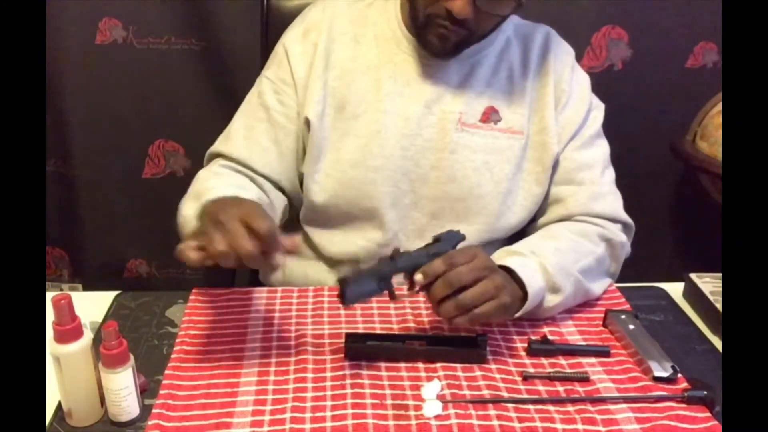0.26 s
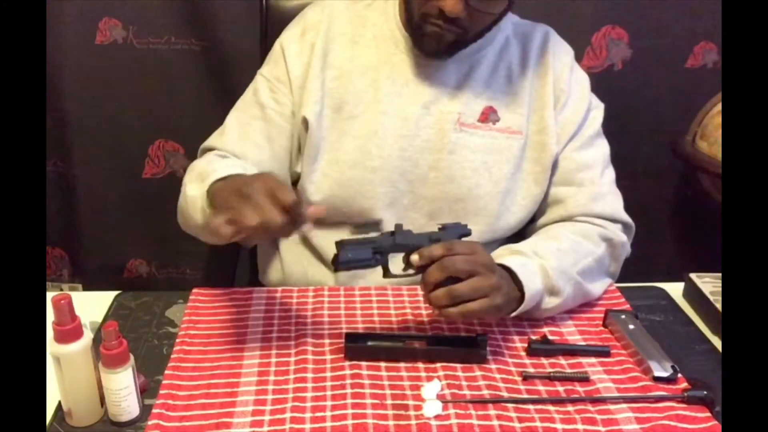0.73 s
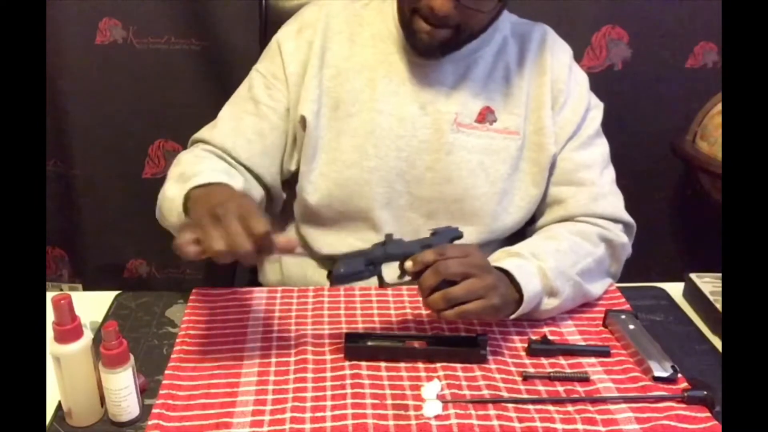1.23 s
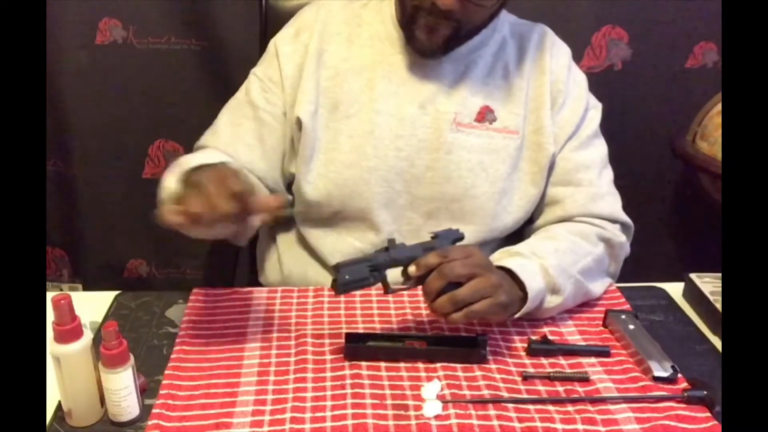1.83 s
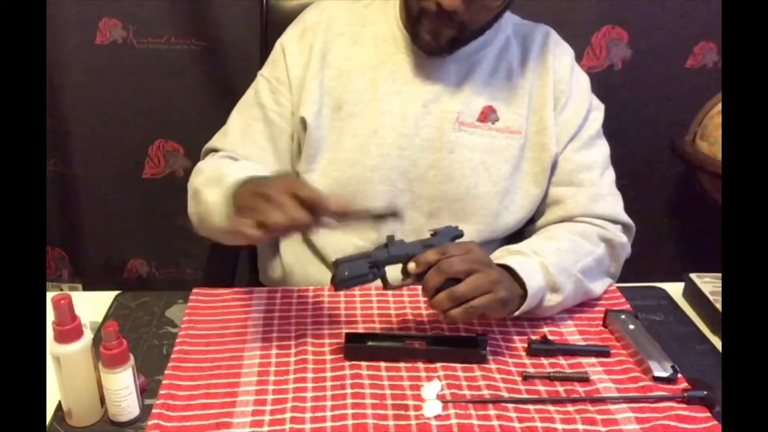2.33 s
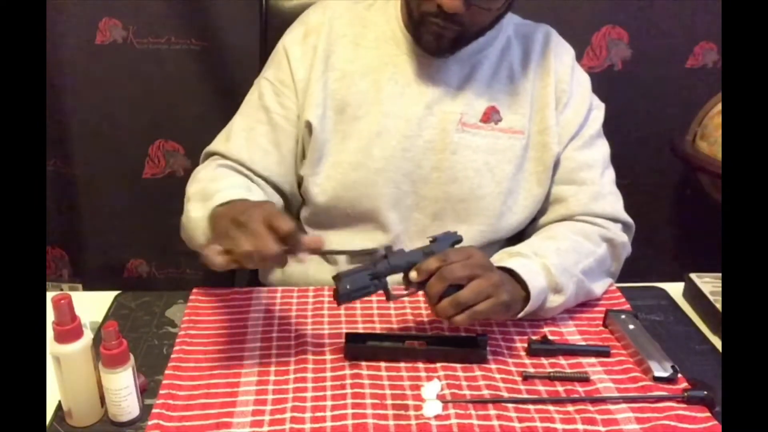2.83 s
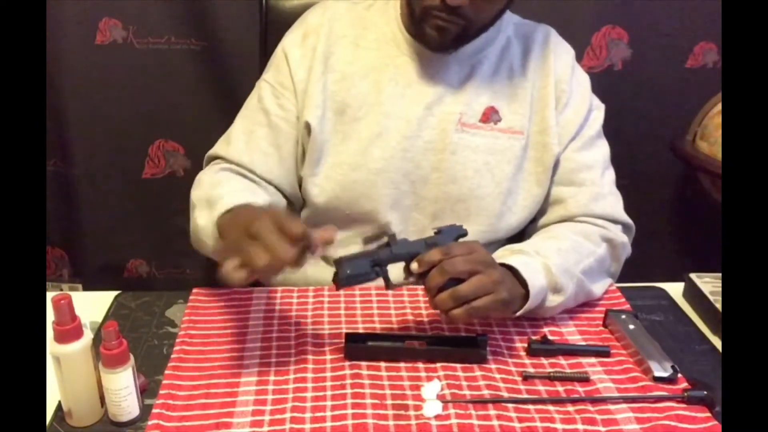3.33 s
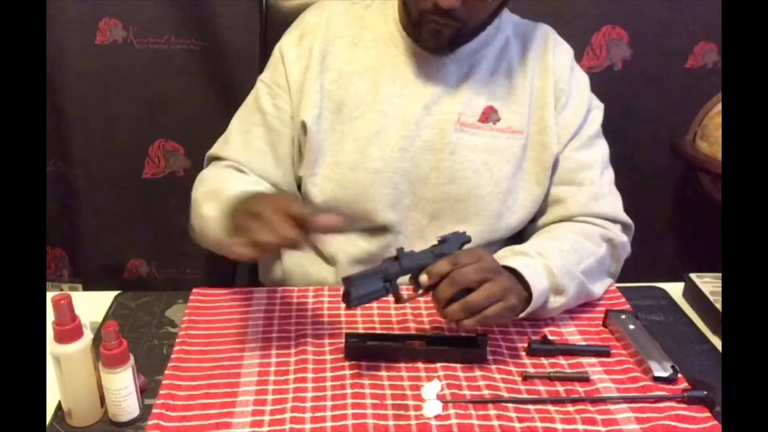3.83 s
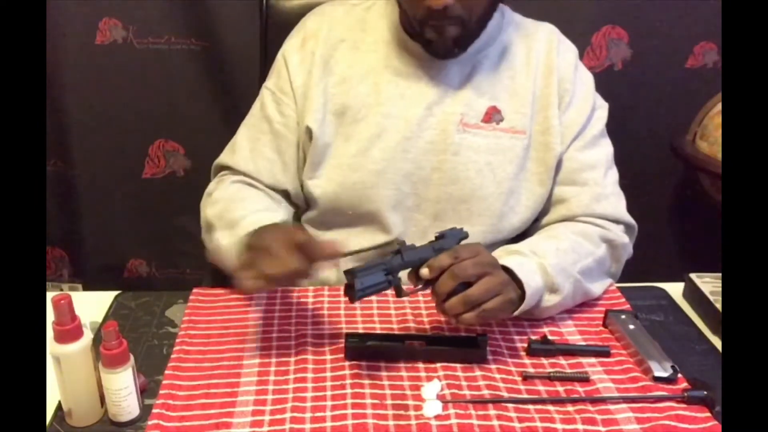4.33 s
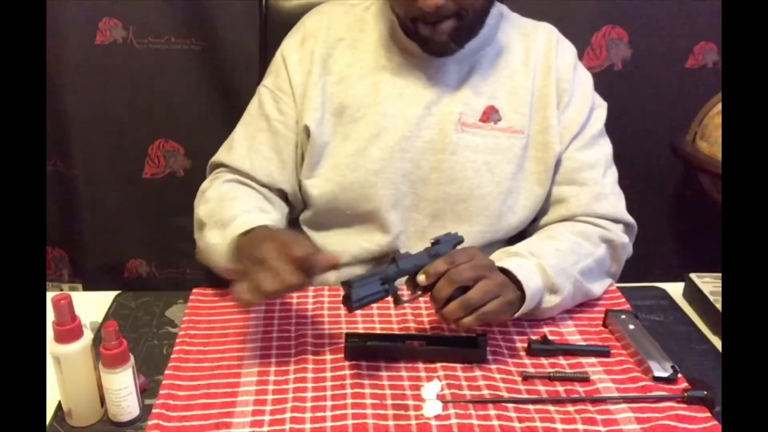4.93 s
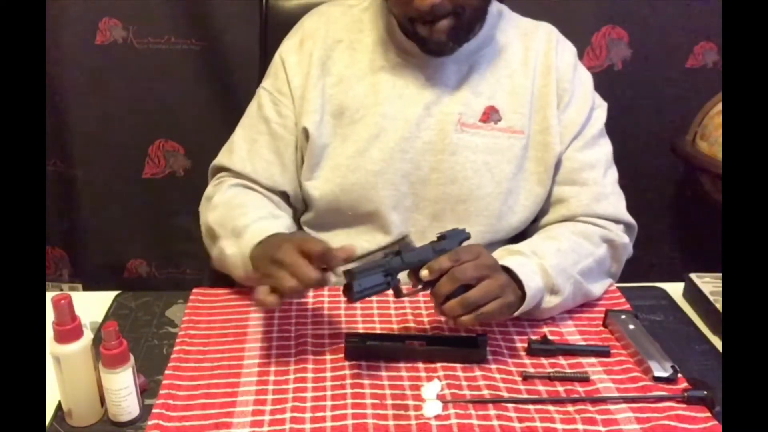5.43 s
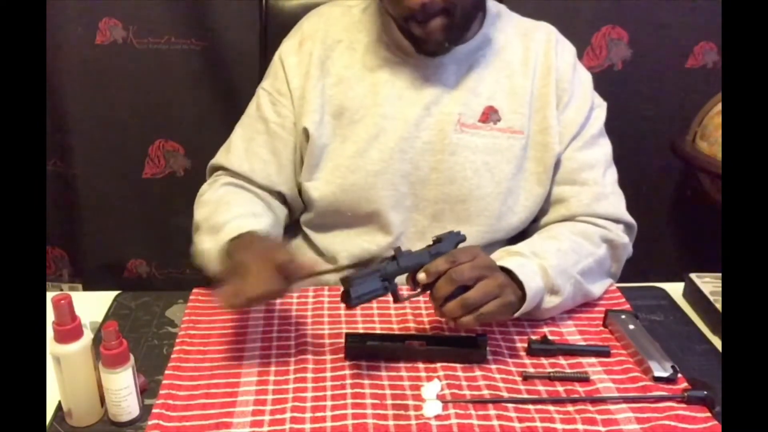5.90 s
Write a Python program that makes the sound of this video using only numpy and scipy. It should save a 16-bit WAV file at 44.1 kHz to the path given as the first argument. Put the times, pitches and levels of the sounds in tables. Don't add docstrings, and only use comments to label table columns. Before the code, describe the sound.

A close microphone in a small room picks up a stiff brush working on a small steel-and-plastic frame held in the hand. From 0 s, quick dry strokes rasp with a bright bristle hiss, while the brush head knocks the frame at about 0.05 and 0.5 s. Near 0.8 s a hard slip off the edge makes a loud ringing clack, with a weaker, deader one at 1.15 s. More taps and bumps fall around 1.4 to 2 s, some with soft thuds. The loudest, sharpest clack comes at 2.3 s, followed by knocks near 2.7 s. From 3 to 6 s the scrubbing is lighter and more continuous, in short scratchy strokes with small ticks and a modest tap near 4.95 s. A last clear tap sounds at 6 s before brief final brushing. Short wall reflections follow each sound; a faint low hum and airy room noise continue throughout.

```python
import sys
import numpy as np
from scipy import signal
from scipy.fft import rfft, irfft, next_fast_len
from scipy.io import wavfile
from scipy.ndimage import map_coordinates

SR = 44100
rng = np.random.default_rng(int(sys.argv[2]) if len(sys.argv) > 2 else 0)


def amplitude_ratio(level_db):
    exponent = np.asarray(level_db, float) / 20
    return 10 ** exponent


def master(y):
    cut = np.clip(np.atleast_2d(y).T, -1, 1)
    pcm = np.round(cut * 32767)
    wavfile.write(sys.argv[1], SR, pcm.astype(np.int16))


N = 271679

# [f/Hz, width/Hz, level/dB]
GRIP_MODES = [
    (1135, 103, -3.5),
    (1403, 180, 2.5),
    (1740, 650, -6.5),
]
# [f/Hz, width/Hz, level/dB]
HAND_MODES = [
    (320, 230, 0.5),
    (674, 340, -5.5),
]


def unit(x):
    return x / np.sqrt(np.mean(x ** 2) + 1e-20)


def along(points, hz):
    f, value = np.transpose(points)
    return np.interp(np.log(hz + 1), np.log(f + 1), value)


def wobble(rate):
    knots = rng.standard_normal(int(N * rate / SR) + 4)
    return map_coordinates(knots, [np.arange(N) * rate / SR])


def filtered(x, response):
    m = next_fast_len(x.shape[-1] + 8192)
    spectrum = rfft(x, m) * response(np.fft.rfftfreq(m, 1 / SR))
    return irfft(spectrum, m)[..., :x.shape[-1]]


def modes(table):
    def response(f):
        return sum((-1) ** k * amplitude_ratio(db) * 1j * f * width / (hz * hz - f * f + 1j * f * width)
                   for k, (hz, width, db) in enumerate(table))
    return response


def twice(table):
    return lambda f: modes(table)(f) ** 2


def flicks():
    strength_db = 1.6 * np.minimum(rng.exponential(size=N), 3)
    size = amplitude_ratio(strength_db) * rng.standard_normal(N)
    return unit(size * (rng.random(N) < 0.4))


def air():
    # [f/Hz, level/dB per Hz]
    room_noise = [(20, -62.5), (36, -25), (60, -13), (100, -9.5), (190, -11), (290, -19), (550, -27.5),
                  (800, -27), (1400, -33), (2000, -31.5), (5000, -35.5), (9000, -39.5), (14500, -44),
                  (16000, -65)]
    noise = filtered(rng.standard_normal(N), lambda f: amplitude_ratio(along(room_noise, f)))
    return amplitude_ratio(-66.5) * unit(noise)


def hum():
    # [f/Hz, level/dB rms]
    lines = [
        (60, -78),
        (89.5, -70.5),
        (120, -65),
        (171, -71),
        (180, -63),
        (240, -77.5),
    ]
    t = np.arange(N) / SR
    out = np.zeros(N)
    for hz, db in lines:
        level = np.sqrt(2) * amplitude_ratio(db + 1.2 * wobble(3.037))
        phase = 6 * rng.random() + 0.76 * wobble(3.884)
        out += level * np.sin(2 * np.pi * hz * t + phase)
    return out


def tail():
    # [f/Hz, t60/s]
    decay_time = [(300, 0.24), (2000, 0.2), (5500, 0.23), (15000, 0.21)]
    # [f/Hz, level/dB]
    colour = [(300, -1), (2000, -2), (3600, 1), (5500, -1), (9000, 1), (15000, 0)]
    hz, t, z = signal.stft(rng.standard_normal(SR // 3), SR, nperseg=256)
    level_db = along(colour, hz)[:, None] - 60 * t / along(decay_time, hz)[:, None]
    answer = signal.istft(z * amplitude_ratio(level_db), SR, nperseg=256)[1]
    late = np.clip(np.arange(len(answer)) / SR - 0.0022, 0, None)
    answer = answer * (1 - np.exp(-late / 0.0021))
    return answer / np.linalg.norm(answer)


def room(dry):
    hop = SR // 16
    out = np.zeros(N + SR)
    fade = np.hanning(2 * hop + 1)[:-1]
    padded = np.pad(dry, (hop, 2 * hop))
    for start in range(0, N + hop, hop):
        wet = signal.fftconvolve(padded[start:start + 2 * hop] * fade, tail())
        out[start:start + len(wet)] += wet
    return out[hop:hop + N]


def thumps():
    # [t/s, peak level/dB]
    pushes = [(0.051, -53.5), (0.512, -57), (0.788, -46.5), (1.371, -58), (1.533, -51.5), (1.963, -49),
              (2.324, -48.5), (2.687, -51.5), (2.999, -58), (3.491, -59), (6.018, -55)]
    out, t = np.zeros(N + 4096), np.arange(4096) / SR
    for s, db in pushes:
        burst = rng.standard_normal(len(t)) * amplitude_ratio(-60 * t / 0.03)
        push = filtered(burst, twice(HAND_MODES))
        out[round(s * SR):][:len(t)] += amplitude_ratio(db - 1.0) * push / np.abs(push).max()
    return out[:N]


def contacts():
    # [t/s, peak level/dB, ring f/Hz, grip level/dB]
    taps = [(.0528, -32, 2500, -13), (.3117, -51, 3940, -27), (.5167, -30.5, 3340, -12),
            (1.3729, -32, 2490, -15), (1.5206, -40, 4000, -42), (1.5352, -42.5, 3910, -22),
            (1.9644, -37.5, 2690, -16), (2.1601, -51, 2300, -15), (.8814, -31, 2620, -26),
            (1.8695, -52, 2600, -6), (2.762, -37.5, 2670, -12.5), (3.1708, -52.5, 2110, -10),
            (4.9504, -39.5, 3900, -26), (6.0188, -30, 2580, -7)]
    # [t/s, peak level/dB, ring f/Hz, grip level/dB]
    nicks = [
        (.9778, -49, 3560, -23),
        (1.2295, -45, 3290, -14),
        (2.5748, -49.5, 2550, -26),
        (3.66, -59.5, 2790, -10),
        (3.771, -51, 2630, -26),
        (4.001, -50.5, 2600, -30),
        (4.034, -51, 4940, -13),
    ]
    # [t/s, peak level/dB, ring f/Hz, grip level/dB]
    bumps = [
        (.0661, -40, 2420, -7.5),
        (.2684, -55, 2800, -20),
        (.0635, -36, 4800, -23),
        (.3862, -42.5, 4870, -8.5),
        (.4703, -44, 3300, -16),
        (1.0292, -36, 4800, -27),
        (1.4893, -37, 4500, -22),
        (2.2592, -43, 2530, -2),
    ]
    # [t/s, peak level/dB, ring f/Hz, grip level/dB]
    snaps = [
        (.3731, -46, 2850, -35),
        (.3805, -45, 6400, -25),
        (2.8943, -54.5, 4800, -26),
        (.7484, -37, 3400, -12.5),
        (2.686, -36, 3490, -8),
        (3.201, -42, 2370, -22),
        (3.446, -46.5, 3860, -16),
        (2.2457, -56, 3900, -15),
        (5.966, -52, 4230, -26),
    ]
    # [t/s, peak level/dB, ring f/Hz, sharp edge level/dB, ring damping/0-1]
    slips = [
        (0.7615, -19, 3250, -11.5, 0.36),
        (.7875, -16, 4900, -13.5, 0.33),
        (0.7895, -14.5, 3350, -6, 0.7),
        (1.1574, -23.5, 4220, -17.5, .98),
        (2.3072, -36, 3600, -8, 0.25),
        (2.3125, -32.5, 3620, -11, 0.5),
        (2.3223, -34, 4420, 2, .6),
        (2.3248, -12.5, 5300, -8, 0.45),
        (2.3282, -30, 4980, -10.5, .57),
    ]
    # table, sharp edge dB, ring damping 0-1
    kinds = [(taps, -24.5, 0.23), (nicks, -3, 0.19), (bumps, -10.5, 0.68), (snaps, 4.2, 0.57)]
    out = []
    for table, edge_db, damping in kinds:
        for s, db, hz, grip_db in table:
            out.append((s, db, hz, edge_db, grip_db, damping))
    for s, db, hz, edge_db, damping in slips:
        out.append((s, db, hz, edge_db, -20, damping))
    return sorted(out)


def knocks():
    out, t = np.zeros((2, N + 2048)), np.arange(1024) / SR
    blow = 1.0 * (np.arange(len(t)) == 16)
    for s, db, ring_hz, edge_db, grip_db, damping in contacts():
        rebounds = rng.standard_normal(len(t)) * amplitude_ratio(-60 * t / 0.0085)

        ring = filtered(blow + 0.18 * rebounds, twice([(ring_hz, np.abs(damping) * ring_hz, 0)]))
        ring = ring / np.abs(ring).max()
        spread = filtered(blow, twice([(0.65 * ring_hz + 800, 0.8 * ring_hz, 0)]))
        spread = unit(spread) * np.std(ring)

        edge_blows = np.array([blow + 0.8 * rebounds, blow])
        edge = filtered(edge_blows, modes([(4800, 3500, 0), (13700, 4270, -1.5)]))
        edge = edge / np.std(edge, axis=1, keepdims=True) * 0.063

        grip = filtered(blow + 0.22 * rebounds, modes(GRIP_MODES))
        grip = grip / np.abs(grip).max()

        rings = np.array([0.94 * ring, 0.25 * ring + 0.66 * spread])
        knock = rings + amplitude_ratio(edge_db + 3.5) * edge + amplitude_ratio(grip_db) * grip
        out[:, round(s * SR):][:, :len(t)] += amplitude_ratio(db) * knock
    return out[:, :N]


def rubs():
    # [t/s, level/dB rms, f/Hz, half length/s]
    narrow_bands = [(.797, -36.5, 2470, 0.0076), (.797, -34.5, 3300, 0.00565), (2.333, -33.5, 3700, 0.0074),
                    (2.335, -34.5, 2690, 0.007), (2.334, -42, 2030, 0.0061), (3.5, -68.5, 3600, 0.023),
                    (2.655, -54.5, 2540, 0.019), (3.236, -65, 2450, 0.023), (3.862, -67.5, 2350, 0.038),
                    (4.79, -65, 3660, .03), (5.028, -65, 3480, 0.017), (5.245, -61.5, 3970, 0.013),
                    (6.1, -69, 2430, 0.038), (5.69, -62.5, 2530, 0.026), (5.89, -59.5, 4250, 0.016),
                    (5.43, -60, 2400, .025), (2.996, -68, 2130, 0.034), (1.545, -54.5, 7000, 0.014)]
    out, t = np.zeros(N + 8192), np.arange(-4096, 4096) / SR
    tips = flicks()
    for s, db, hz, half in narrow_bands:
        start = round(s * SR) - 4096
        stretch = np.resize(tips[start:start + len(t)], len(t))
        tone = unit(filtered(stretch, twice([(hz, 0.2 * hz, 0)])))
        out[start:start + len(t)] += amplitude_ratio(db) * np.exp(-0.5 * (t / half) ** 2) * tone
    return out[:N]


def strokes():
    # [t of top speed/s, bristle hiss level/dB, length/s, grip level over hiss/dB]
    shoves = [(.089, -46.5, 0.037, -12), (.761, -47, .013, -10), (1.063, -48.5, 0.025, -16),
              (1.291, -50, 0.033, -17.5), (1.534, -44, .044, -20), (2.654, -65.5, 0.027, 5.5),
              (2.684, -54, 0.045, -16), (2.805, -60.5, .024, -22), (3.26, -52.5, .037, -21),
              (3.863, -50, .033, -8.5), (4.545, -54, 0.039, -15), (4.746, -53.5, 0.04, -12),
              (4.958, -50, .039, -17), (5.564, -54.5, 0.047, -13.5), (5.802, -49.5, 0.025, -23)]
    # [t/s, hiss level/dB, length/s, grip level over hiss/dB]
    drags = [(.395, -66, 0.046, -17), (.483, -52, 0.03, -12), (.666, -62.7, 0.028, -12),
             (.978, -68.5, 0.073, -12), (1.34, -53.5, 0.046, -18), (2.255, -68.5, 0.046, -1),
             (2.893, -69.5, 0.069, -12), (2.978, -51, 0.033, -13.5), (3.207, -57, 0.022, -13),
             (1.488, -54.5, .04, -19), (3.483, -51, .037, -14.5), (4.002, -75, 0.016, -10),
             (1.897, -70, .03, -25), (2.14, -74, .05, -25), (4.189, -56.5, 0.054, -14.5),
             (4.312, -56, 0.065, -11.5), (4.392, -50.5, 0.031, -16), (5.242, -53, 0.039, -9.5),
             (5.627, -51, 0.048, -19), (5.742, -57.5, 0.038, -23), (5.847, -55, .051, -11.5),
             (5.92, -59.5, 0.088, -21), (6.077, -64, .064, -22), (6.133, -55, 0.026, -18)]
    # [t/s, hiss level/dB, length/s, grip level over hiss/dB]
    swings = [(.013, -49.5, 0.0099, -5.5), (1.144, -58, 0.043, -25), (1.98, -50, 0.031, -14),
              (2.31, -49.5, 0.027, -8.5), (4.081, -56.5, 0.038, -10.5), (4.605, -54, 0.029, -14),
              (4.803, -53.5, 0.031, -14), (5.027, -51.5, 0.027, -14), (5.166, -52, 0.028, -15),
              (5.391, -52.5, 0.035, -17.5)]
    # [t/s, hiss level/dB, length/s, grip level over hiss/dB]
    grazes = [
        (2.5755, -55, .006, -9),
        (3.173, -57, .0015, -2),
    ]
    # [t/s, frame ring level over the hiss of a firm stroke/dB]
    turning = [(0, -2.5), (.55, -3.5), (.8, 1.5), (1.4, 0.1), (1.55, -1.5), (3.25, -3.5), (3.5, 3.5),
               (4.1, -4), (4.6, -2.5), (5.2, -2.5), (5.6, -2.5), (5.85, 1), (6.1, -3.5)]
    # table, share of the length speeding up, share slowing down, extra ring dB
    kinds = [(shoves, 1, 0.15, 0), (drags, 0.26, 1, 0), (swings, 1, 1, 0), (grazes, 0.26, 1, -15)]
    out = []
    for table, up, down, ring_db in kinds:
        for s, db, length, grip_db in table:
            frame_db = ring_db + np.interp(s, *np.transpose(turning)) - 0.19 * (db + 51)
            out.append((s, db, up * length, down * length, frame_db, grip_db))
    return np.transpose(out)


def brush():
    # [f/Hz, level/dB per Hz]
    tip_hiss = [(2650, -27), (4500, -7.5), (5840, -1), (7290, 4), (9360, 0.5), (10100, -1), (10900, 3),
                (13700, 4), (15100, 1.5), (16000, -27)]
    # [f/Hz, width/Hz, level/dB]
    frame_modes = [(2380, 193, -1.5), (2654, 370, 2), (3350, 660, 3), (4000, 820, -2.5), (4900, 1060, -8)]
    s, hiss_db, rise, fall, frame_db, grip_db = strokes()
    ticks = np.arange(0, N + 64, 64) / SR
    lag = ticks[:, None] - s
    side = np.where(lag < 0, np.abs(rise) + 0.001, np.abs(fall) + 0.001)
    speed = np.exp(-(lag / side) ** 2)

    def gain(db):
        return np.interp(np.arange(N) / SR, ticks, np.sqrt(speed @ amplitude_ratio(2 * db)))

    tips = amplitude_ratio(1.5 * wobble(160)) * flicks()
    hiss_curve = [(2500, -40), *tip_hiss]
    hiss = unit(filtered(tips, lambda f: amplitude_ratio(along(hiss_curve, np.minimum(f, 15000)))))
    upper = amplitude_ratio(4.6 * wobble(12)) * filtered(hiss, lambda f: 1 / (1 + (8500 / (f + 1)) ** 4))
    hiss = unit(hiss + 0.5 * upper)

    frame = unit(sum(amplitude_ratio(db + 3 * wobble(9)) * filtered(tips, modes([(hz, width, 0)]))
                     for hz, width, db in frame_modes))
    thud = unit(filtered(tips, twice(HAND_MODES)))
    grip = unit(filtered(tips, twice(GRIP_MODES)))
    drift = amplitude_ratio(0.4 * np.array([wobble(30), wobble(30), wobble(30)]))
    return (drift[0] * gain(hiss_db - 2.0) * hiss
            + drift[1] * gain(hiss_db + frame_db - 3.5) * frame
            + drift[2] * gain(hiss_db + grip_db - 4.0) * (grip + amplitude_ratio(-8.5) * thud))


def scene():
    scrub = brush() + rubs()
    near, around = knocks()
    low = thumps()
    reverb = room(amplitude_ratio(0.5) * scrub + amplitude_ratio(1.5) * around + amplitude_ratio(-2.5) * low)
    steady = filtered(scrub + reverb + air(), lambda f: f < 15780)
    return (near + low + steady + hum())[None]


def band_limit(x):
    return signal.sosfilt(signal.butter(12, 16820, fs=SR, output="sos"), x)


def record(dry):
    limited = filtered(dry, lambda f: 1 / (1 + (f / 16300) ** 90))
    return band_limit(limited)


dry = scene()
out = record(dry)
master(out)
```